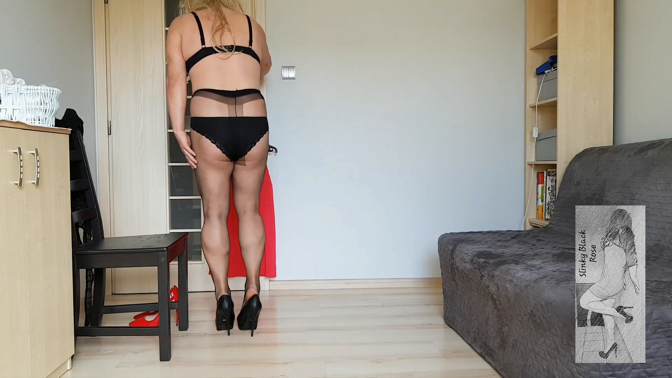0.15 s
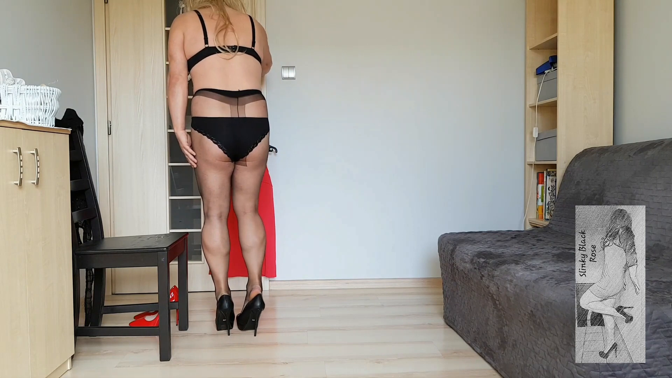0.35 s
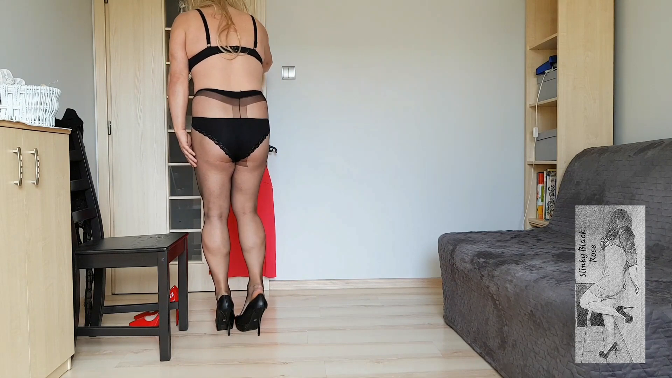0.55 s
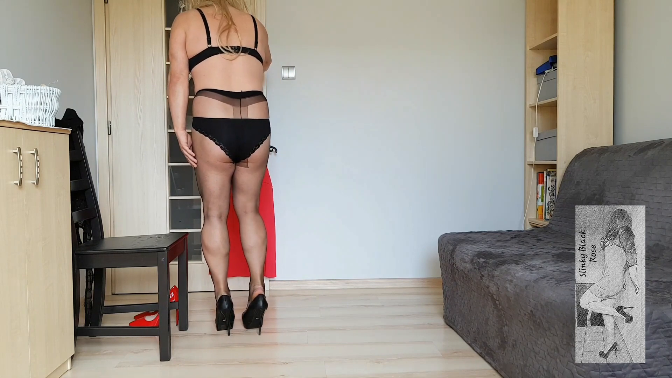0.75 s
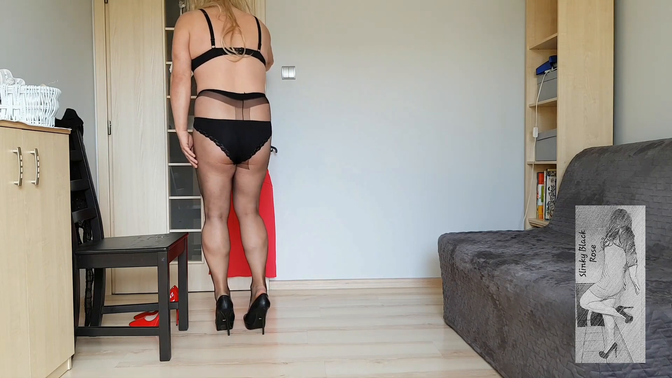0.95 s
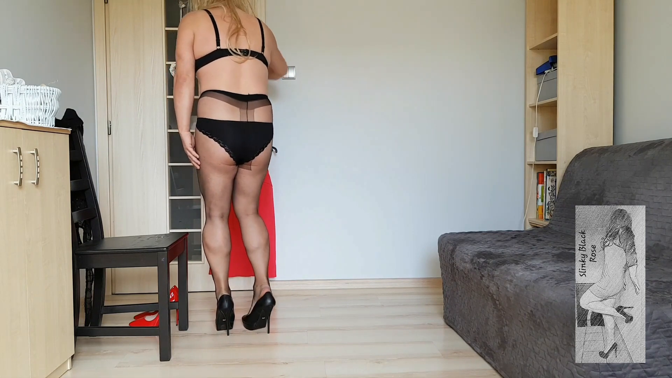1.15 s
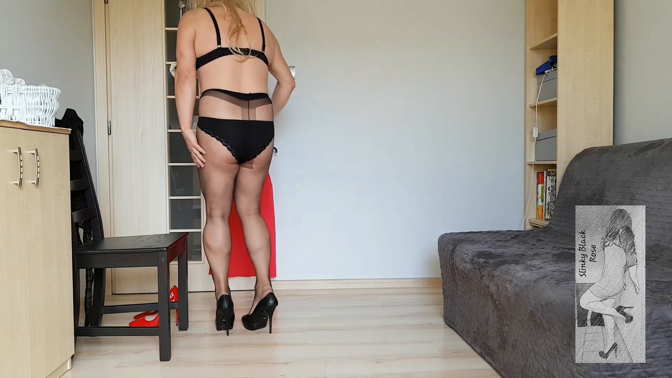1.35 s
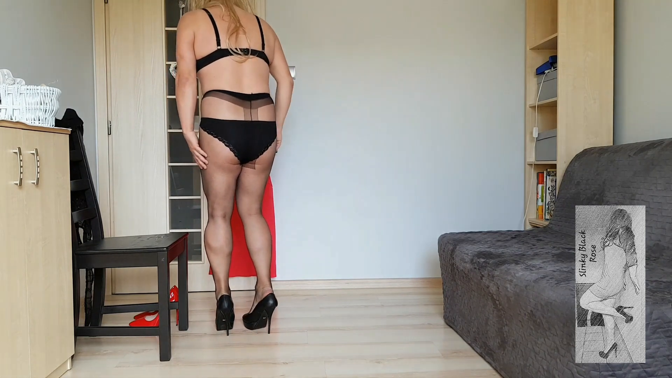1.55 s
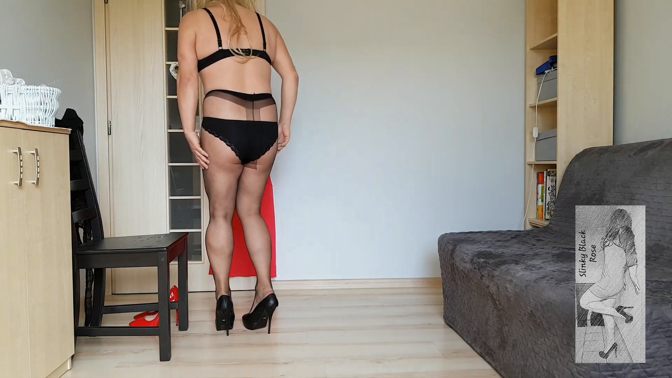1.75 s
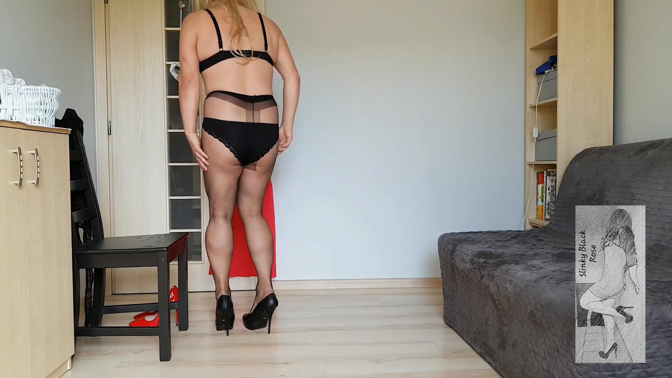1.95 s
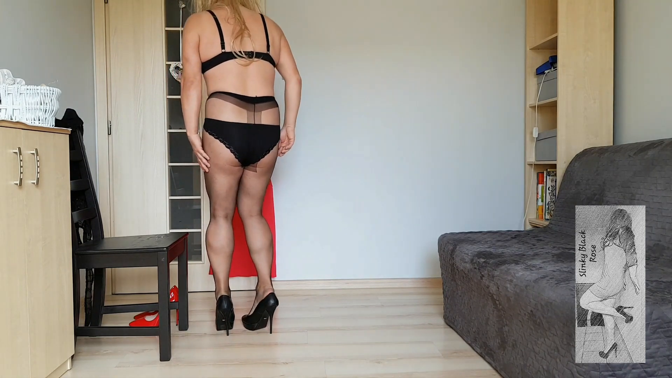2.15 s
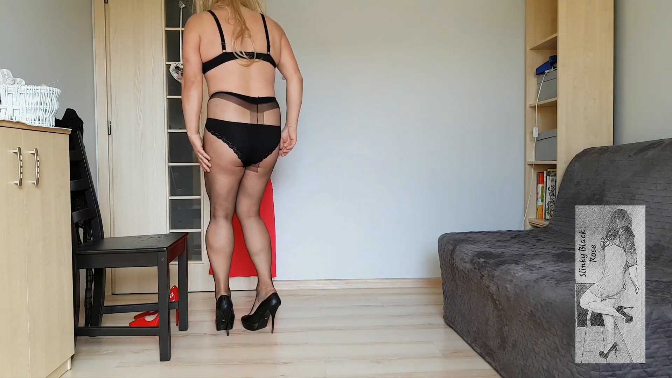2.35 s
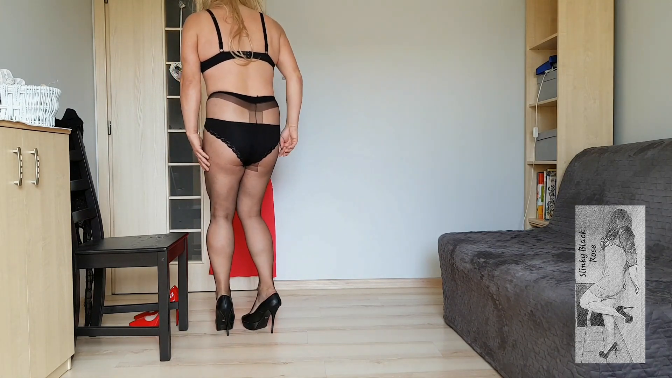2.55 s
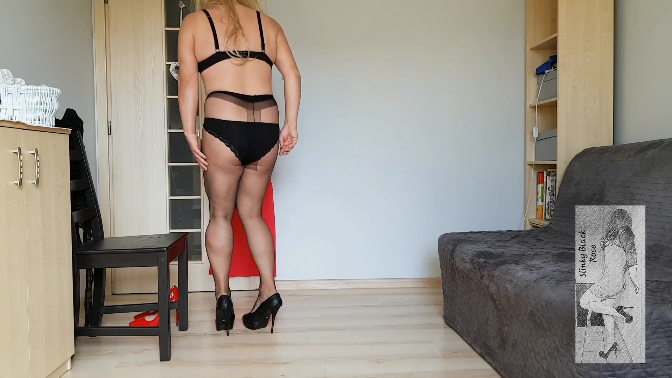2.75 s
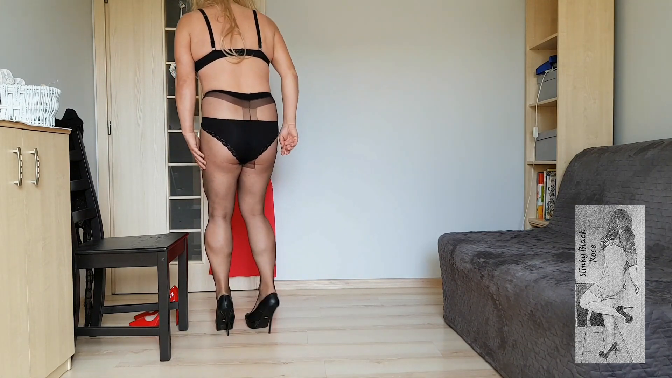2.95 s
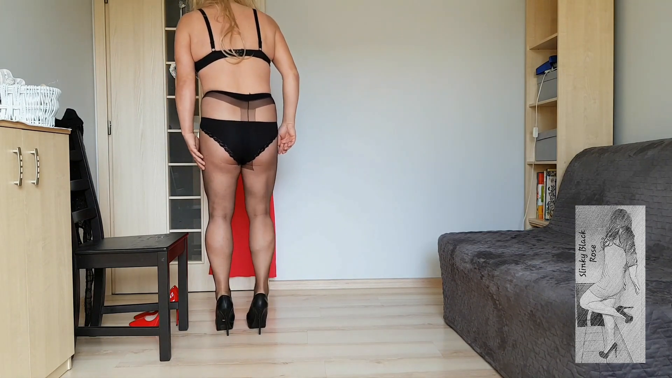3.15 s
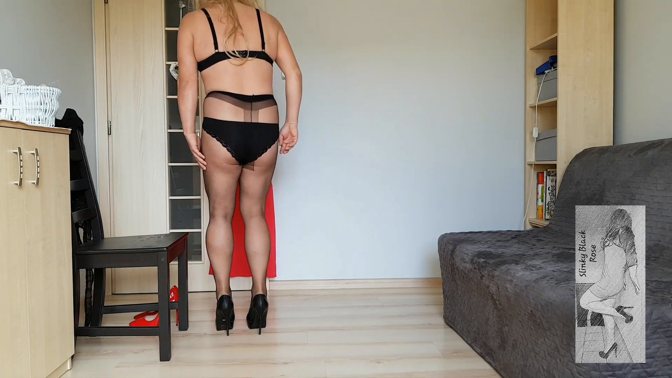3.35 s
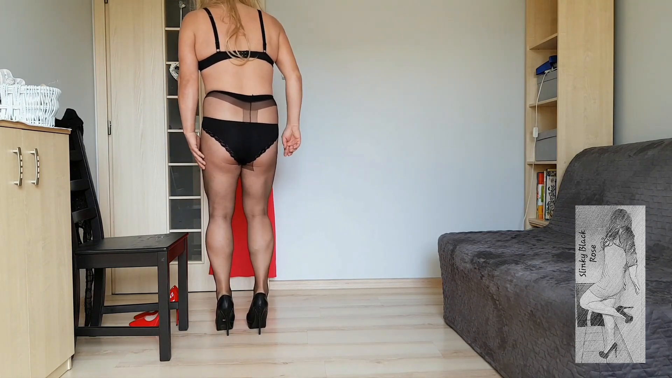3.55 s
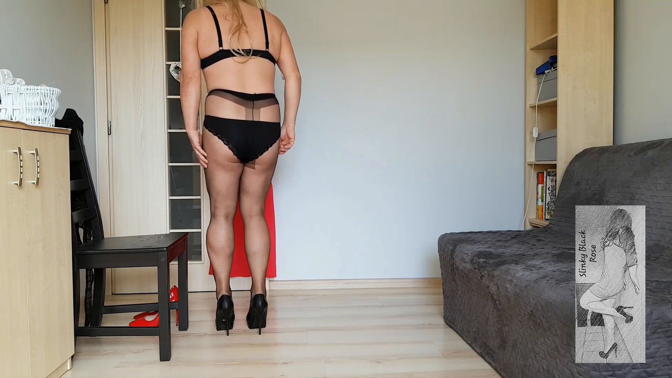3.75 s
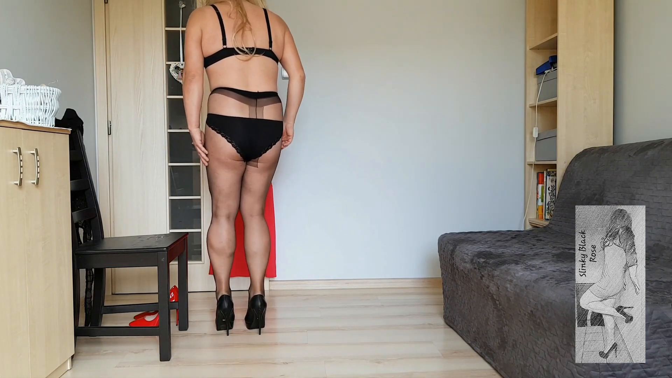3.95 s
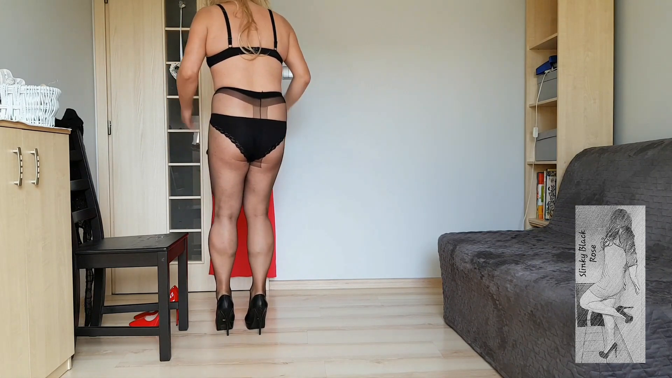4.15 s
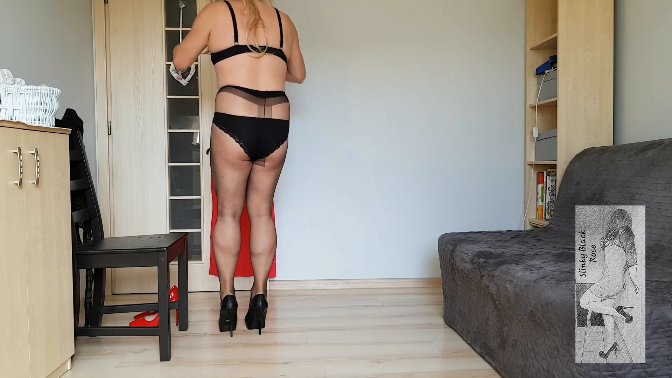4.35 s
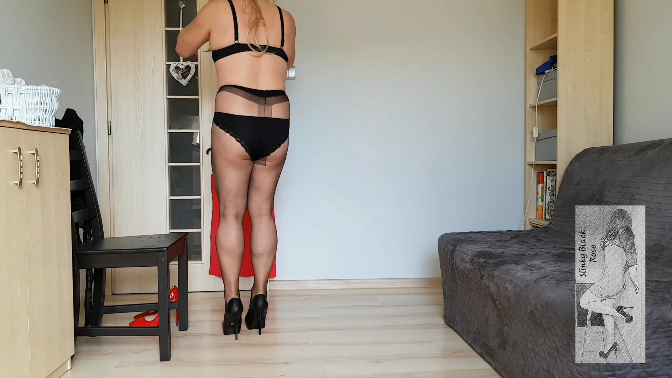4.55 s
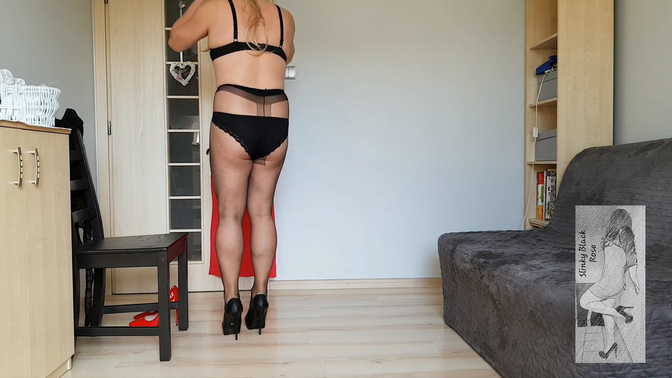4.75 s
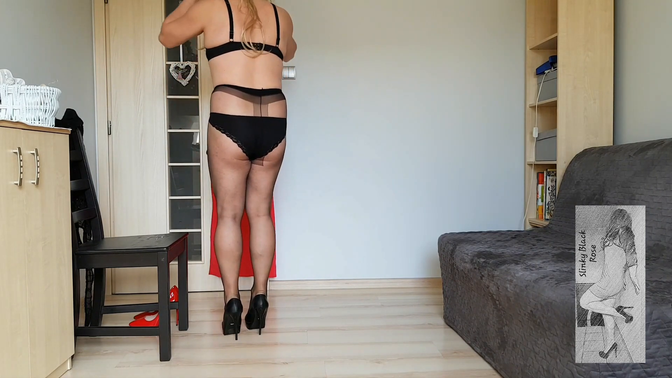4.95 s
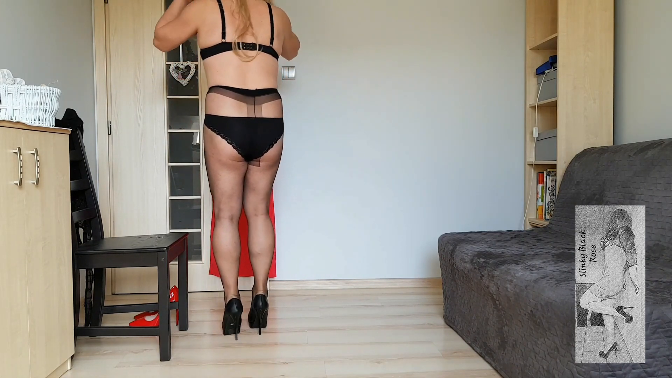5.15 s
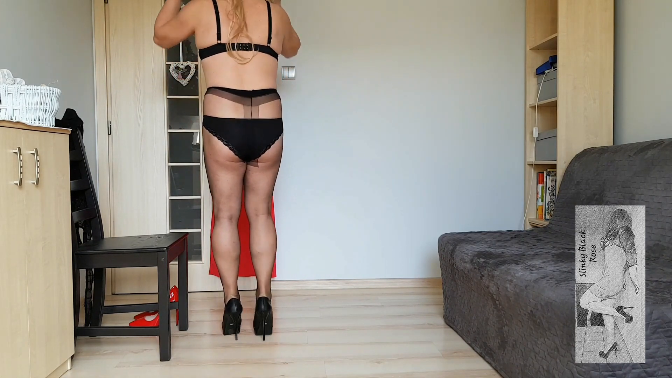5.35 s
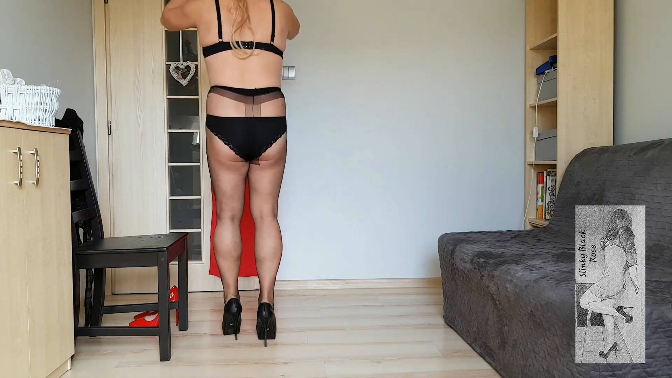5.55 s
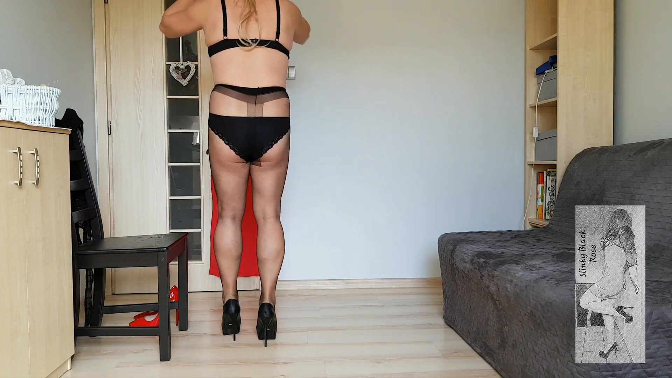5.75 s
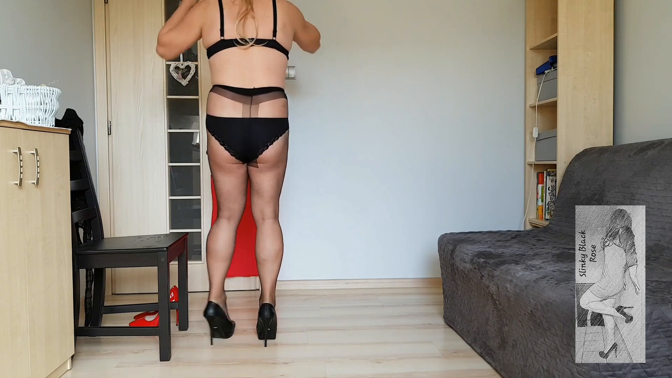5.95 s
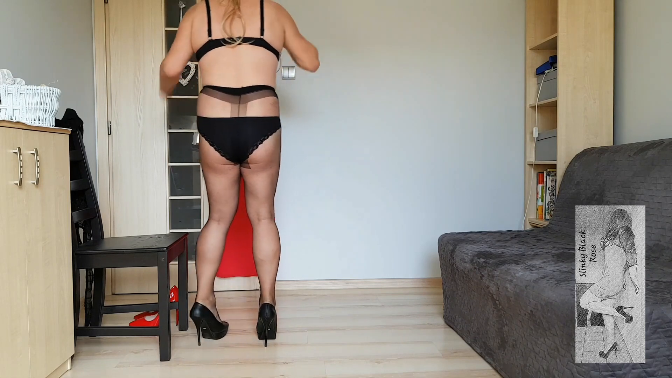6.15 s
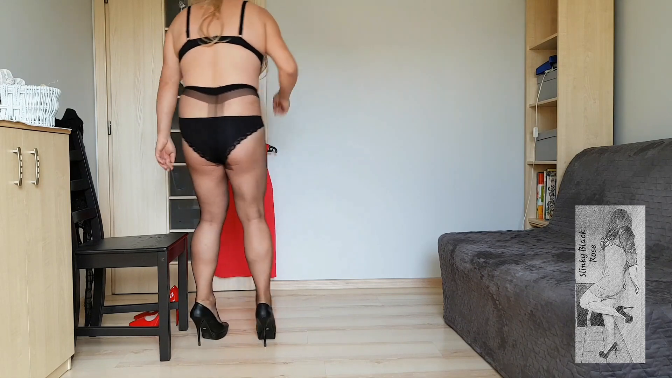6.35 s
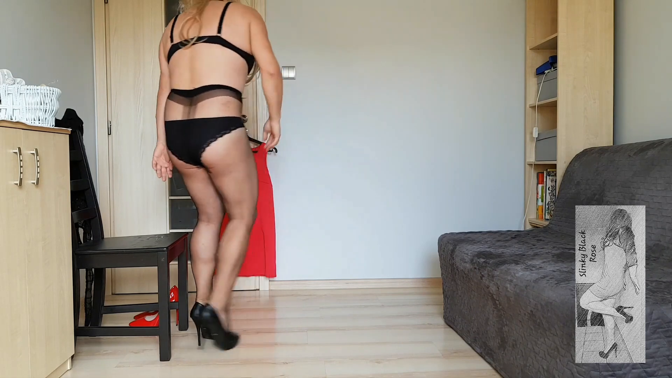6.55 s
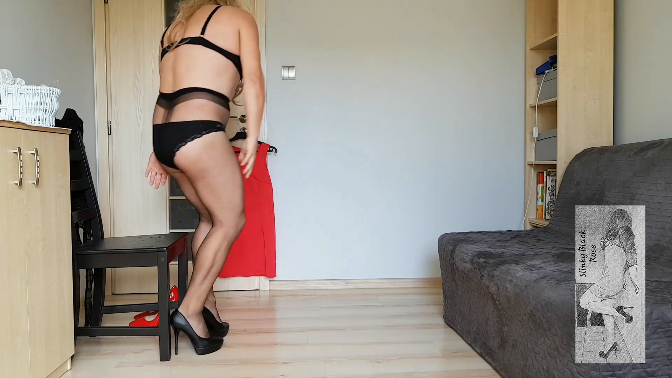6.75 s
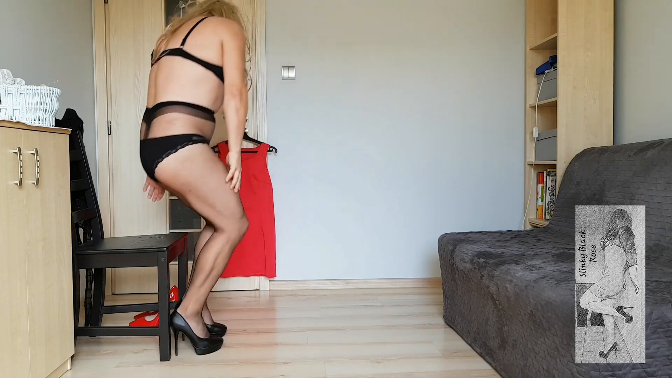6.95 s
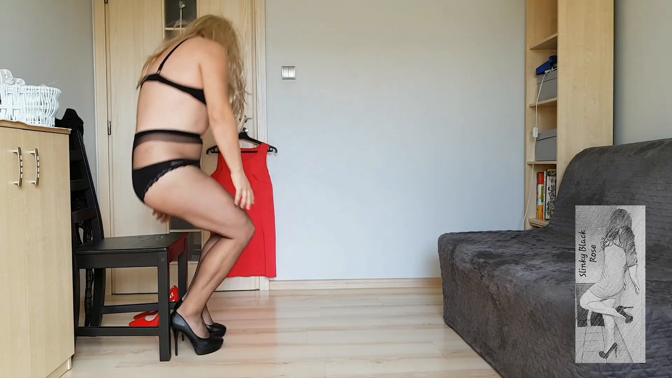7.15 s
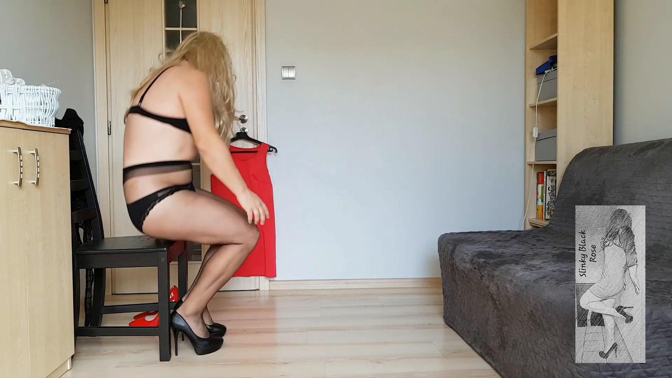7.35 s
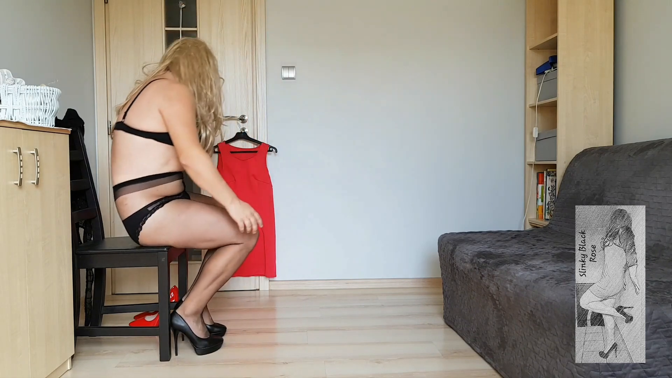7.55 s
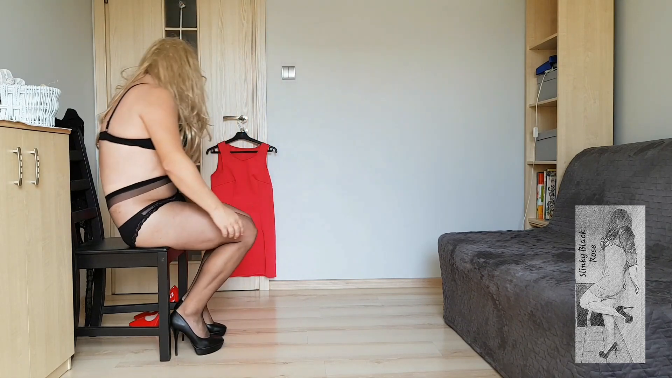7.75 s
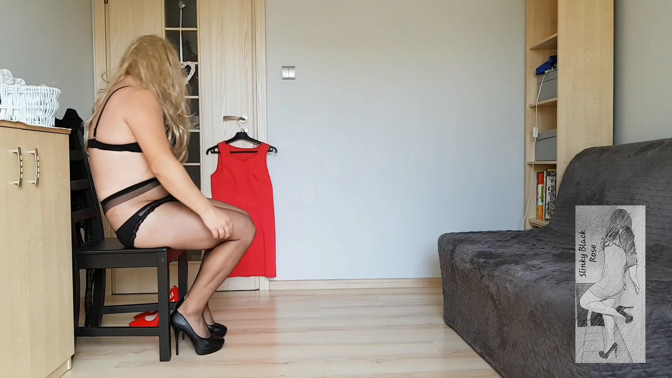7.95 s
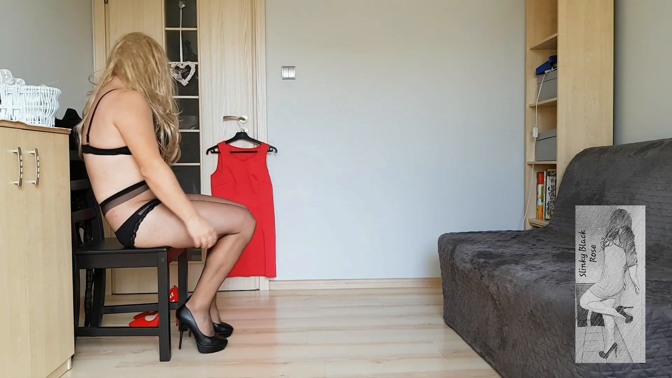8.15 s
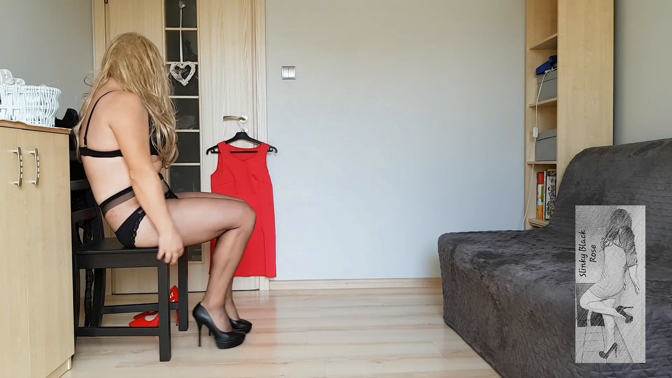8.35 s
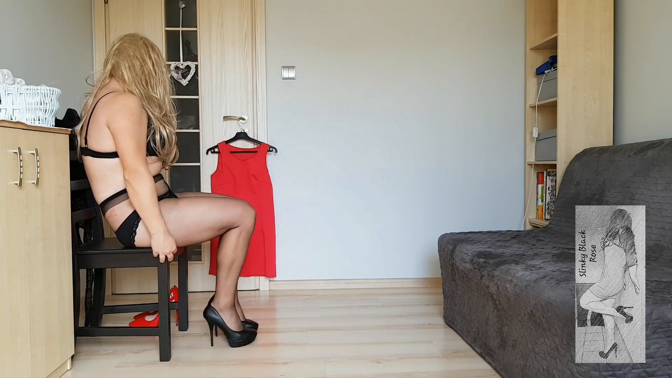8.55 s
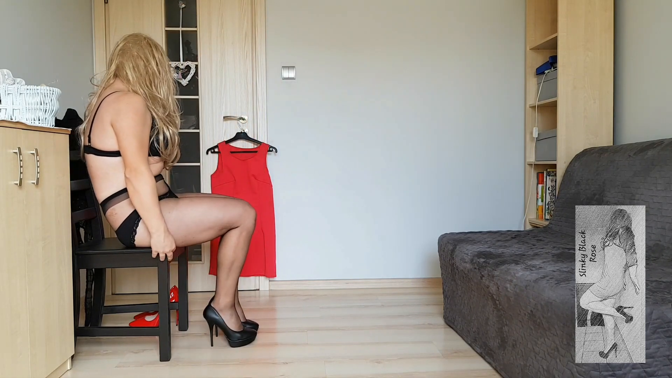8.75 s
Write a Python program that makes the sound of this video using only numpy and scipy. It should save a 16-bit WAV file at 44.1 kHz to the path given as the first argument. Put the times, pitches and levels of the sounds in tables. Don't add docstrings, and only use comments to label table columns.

```python
import sys
import numpy as np
from scipy import signal
from scipy.fft import rfft, irfft, next_fast_len
from scipy.io import wavfile
from scipy.ndimage import uniform_filter1d

SR = 44100
rng = np.random.default_rng(int(sys.argv[2]) if len(sys.argv) > 2 else 0)


def put_to_file(sound):
    columns = np.atleast_2d(sound).T
    safe = np.clip(columns, -1, 1)
    whole_steps = np.round(safe * 32767)
    wavfile.write(sys.argv[1], SR, whole_steps.astype(np.int16))


def amplitude_ratio(level_db):
    exponent = np.asarray(level_db, float) / 20
    return 10 ** exponent


N = 388124

# start_s, peak_db, ring_hz, thud_db (re peak), tick_db (re peak)
HEEL_BLOWS = [(0.139, -52, 815, -15, 1), (1.063, -30.5, 775, -4, -12.5), (1.76, -49.5, 513, -10, -3.5),
              (1.981, -44, 517, 0.5, -19), (2.146, -44.5, 705, -15, -10.5), (2.197, -39, 830, -17, -10),
              (2.484, -49, 574, -17, -19), (3.086, -49.5, 580, 4, -20), (3.268, -47, 608, -3, -7.5),
              (3.311, -13, 720, -12, -23), (3.644, -48, 830, -22, -23), (3.816, -46.5, 820, -16, -24),
              (4.135, -48, 844, -10.5, -11.5), (4.433, -52.5, 790, -13, -15), (4.616, -42.5, 780, -20, -10),
              (4.684, -24, 837, -3, -20.5), (5.697, -38.5, 510, -19, -21.5), (6.281, -23.5, 586, -8.5, -24),
              (6.763, -30, 500, -13, -8), (6.974, -40, 553, 0, -14), (7.106, -38.5, 585, 1.5, -32),
              (7.992, -53.5, 560, -9, -6), (8.706, -22, 540, -9, -25.5)]
# start_s, peak_db, ring_hz, thud_db (re peak), tick_db (re peak)
SOLE_LANDINGS = [(0.014, -52, 905, -5, -30), (0.065, -50.5, 720, -33, -7), (0.906, -47, 760, -7.5, -12),
                 (0.939, -44.5, 855, -11, -10), (1.341, -55.5, 840, -13, -9), (1.497, -52, 810, -21, -11.5),
                 (2.351, -52, 880, -11, -14), (2.697, -48.5, 570, -18, -21), (2.74, -53, 545, -8, -10),
                 (2.877, -52, 533, -8, -7), (3.686, -48, 780, -22, -7.5), (3.863, -47, 495, -16, -5.5),
                 (5.353, -52.5, 860, -11.5, -11), (5.584, -36, 818, -12, -10), (5.604, -40, 620, -24, -13),
                 (5.919, -43, 830, -4.5, -14), (5.944, -46.5, 505, -14, -12.5),
                 (6.309, -35.5, 646, -13.5, -18.5), (6.545, -42, 560, -11, -26),
                 (6.559, -38, 600, -13.5, -15.5), (8.376, -53.5, 547, -8, -32.5),
                 (8.701, -25.5, 535, -2, -22)]
# start_s, peak_db, ring_hz, thud_db (re peak), tick_db (re peak)
SOLE_SKIPS = [
    (0.642, -40, 1060, -38, -22),
    (0.657, -38, 1050, -34, -22),
    (0.677, -38.5, 890, -22, -19),
    (6.945, -44, 959, -26, -12.5),
]
TIP_CHATTER_MS, SOLE_CHATTER_MS, SKIP_CHATTER_MS = 3.5, 16, 28
# mode_hz, width_hz, level_db
BOARD_MODES = [(558, 100, 1.5), (611, 210, 6.5), (670, 160, -2), (785, 110, -6.5), (844, 99, -9.5),
               (1102, 99, -9.5), (1195, 130, -14.5), (1307, 110, -8), (1515, 140, -30.5), (1660, 161, -22)]
# mode_hz, width_hz, level_db
JOIST_MODES = [(110, 25, -16.5), (189, 11, -2.5), (210, 38, -0.5), (257.4, 29, 1.5), (286, 72, 1),
               (325, 17, -4.5)]
# frequency_hz, level_db
TICK_SPECTRUM = [(1000, -6.5), (1700, -2.5), (2500, -2), (4000, -4), (6500, -13), (12000, -91)]
CONTACT_HZ, BOARD_CUT_HZ, SOLE_CUT_HZ = 2350, 470, 920

# start_s, peak_db, pitch_hz,
# width_hz
PLATFORM_TAPS = [(0.066, -46, 735, 90), (0.173, -56, 675, 90), (0.203, -50, 710, 90), (0.468, -55, 557, 80),
                 (0.488, -48, 526, 80), (0.541, -54, 820, 90), (0.660, -38, 914, 120),
                 (0.786, -52, 929, 90), (0.906, -51, 746, 90), (1.982, -52, 900, 250),
                 (2.307, -58, 875, 80), (2.335, -53.5, 840, 80), (2.368, -59, 862, 70),
                 (2.484, -58, 557, 70), (2.565, -55.5, 590, 80), (2.613, -56.5, 662, 80),
                 (2.655, -55, 545, 80), (2.774, -54.5, 560, 80), (2.841, -53, 806, 80),
                 (2.923, -55.5, 477, 80), (3.311, -21, 820, 110), (3.316, -27.5, 490, 60),
                 (3.4, -36.5, 511, 50), (4.136, -59.5, 820, 80), (4.628, -54, 500, 60),
                 (4.652, -55, 664, 90), (4.684, -32.5, 830, 130), (4.688, -30.5, 514, 43),
                 (4.719, -44, 640, 70), (6.312, -39.5, 614, 50), (6.546, -46, 577, 53),
                 (6.564, -39, 505, 56), (6.572, -42, 600, 60), (6.566, -44, 803, 50),
                 (6.975, -49.5, 330, 50), (5.585, -51, 300, 60), (5.697, -43.5, 518, 60),
                 (7.483, -43.5, 354, 20), (7.509, -37, 336, 23), (8.708, -35, 562, 40)]
TAP_RISE_MS = 0.85

# peak_s, rise_s, fall_s, level_db
SOLE_DRAGS = [(0.07, 0.36, 0.92, -57), (0.6, 0.31, 0.078, -55.5), (0.71, .03, 0.054, -54),
              (0.78, 0.059, 0.046, -56.5), (0.84, 0.046, .3, -69), (1.13, 0.037, 0.12, -50.5),
              (1.6, 0.21, 0.12, -60), (2.84, 0.27, .25, -64), (3.28, 0.047, .12, -60),
              (3.38, .05, 0.11, -44), (3.45, 0.18, 0.051, -46), (3.7, .13, .12, -61.5), (3.82, .1, .3, -75),
              (3.94, 0.28, 0.25, -64), (4.63, 0.033, 0.44, -64), (5.37, 0.34, .13, -69.5),
              (5.66, 0.12, .08, -60.5), (5.96, 0.14, 0.096, -57), (6.4, 0.15, 0.11, -65),
              (6.57, 0.059, 0.087, -55.5), (6.79, 0.035, 0.11, -44), (6.98, 0.061, .1, -53),
              (7.12, .3, 0.16, -60.5), (7.52, 0.055, 0.26, -58.5), (7.67, .15, 0.12, -58.5),
              (8.06, 0.16, 0.23, -69), (8.36, 0.27, 0.16, -59.5), (8.693, .004, .03, -49.5),
              (8.8, 0.16, .1, -54)]
# peak_s, rise_s, fall_s, level_db
SOLE_TWISTS = [(0.0, 0.047, 0.13, -54.5), (0.08, .15, .12, -60.5), (0.68, 0.048, .07, -43.5),
               (0.88, .06, .2, -63), (3.32, 0.016, 0.086, -48.5), (6.3, 0.017, 0.086, -59.5),
               (1.99, 0.038, 0.043, -55), (2.94, .25, .3, -70.5), (3.9, 0.085, 0.037, -59.5),
               (4.71, 0.072, 0.11, -57), (5.59, 0.048, .15, -61), (5.96, .1, 0.061, -63),
               (6.57, .045, 0.069, -57.5), (6.79, .035, 0.082, -48), (7.67, 0.094, 0.22, -53.5),
               (8.0, 0.14, 0.37, -67.5), (8.8, 0.43, .1, -63.5)]
# peak_s, rise_s, fall_s, level_db, nylon_swish_db (re level)
GRIT_SCUFFS = [(0.07, .2, 0.12, -71, -8), (0.2, .3, 0.43, -71, -11), (0.661, 0.025, 0.079, -46.5, -7.5),
               (0.79, 0.022, 0.036, -59.5, -1.5), (1.08, 0.072, 0.18, -61.5, -12.5),
               (1.76, .045, 0.17, -65, -19), (2.2, 0.063, 0.12, -68.5, -15), (2.91, .11, 0.055, -68.5, -9),
               (3.06, 0.24, 0.16, -68, -5.5), (3.29, .06, 0.053, -64, -16.5),
               (3.422, 0.0128, 0.092, -54.5, -11.5), (3.46, 0.06, 0.034, -57.5, -13),
               (3.7, .085, 0.061, -61.5, -9.5), (3.9, 0.16, 0.21, -67, -7), (4.19, .1, .12, -77, 8),
               (4.63, 0.035, 0.058, -62, -16), (5.37, 0.26, .2, -73.5, -15),
               (5.59, .03, 0.12, -54.5, -11.5), (5.96, .3, .2, -76.5, -2), (6.3, .055, .15, -73, -19.5),
               (6.788, 0.038, 0.066, -48, -13.5), (7.03, 0.19, 0.1, -63.5, -11),
               (7.52, 0.14, 0.56, -67, -8.5), (7.666, 0.047, 0.057, -43.5, -10.5),
               (8.36, 0.22, 0.096, -64, -12.5), (8.7, .02, 0.085, -53, -32)]
# time_s, level_db
FOOT_FIDGET = [(0, -81), (1.0, -63), (1.3, -78), (1.9, -71), (2.15, -74), (2.4, -70), (3.1, -69.5),
               (4.2, -82.5), (5.2, -80), (6.5, -76.5), (7.4, -93), (8.1, -79), (8.8, -82)]
# mode_hz, width_hz, level_db
SOLE_MODES = [(1120, 630, 11), (1310, 400, 7), (2205, 1200, 9.5)]
# frequency_hz, density_db (per Hz)
GRIT_SPECTRUM = [(880, -42), (1500, -9.5), (1960, -2), (2680, -5), (2940, -4.5), (3300, -5), (3950, -5),
                 (9730, -16), (12000, -32.5), (14500, -51)]
SWISH_HZ, SWELL_DB = 11830, 20
DRAG_SQUEAL_DB, FIDGET_GRIT_DB, FIDGET_SWISH_DB = -14.5, -13, -19

# start_s, peak_db, pitch_hz
STRAP_CLICKS = [
    (0.7945, -39.5, 3950),
    (1.623, -54.5, 2930),
    (6.4938, -51.5, 5100),
    (7.6103, -37.5, 1790),
]

# start_s, peak_db, upper_modes_db (re peak)
JOINT_GIVES = [
    (7.483, -40.5, -19),
    (7.496, -43.5, 2),
    (7.508, -40, -10),
    (7.525, -46, -10),
    (7.542, -51, -14),
    (7.58, -55, -6),
    (7.6, -44.5, -13),
    (7.653, -41, -6),
    (7.7, -51, -6),
]
# mode_hz, width_hz, level_db
FRAME_MODES = [(334, 5.5, -6), (362, 20, -11.5)]
# mode_hz, width_hz, level_db
RUNG_MODES = [(1190, 77, -6), (1194, 50, 3), (1770, 47, -1.5), (2250, 65, -5)]
# time_s, level_db
LEG_SKID = [
    (7.6, -86),
    (7.638, -53.5),
    (7.663, -40),
    (7.679, -58),
    (7.8, -71),
]
# mode_hz, width_hz, level_db
LEG_MODES = [(1030, 110, -5), (1503, 170, -3.5), (1750, 220, -0.5), (2267, 170, -2), (2870, 300, -4),
             (3900, 300, -2), (4805, 250, -8)]
# time_s, level_db
LEG_SING = [
    (7.655, -75),
    (7.668, -43),
    (7.69, -55.5),
    (7.74, -62),
    (7.82, -71),
]
# mode_hz, width_hz, level_db
SING_MODE = [(2940, 60, 0)]

# start_s, level_db, pitch_hz
WEIGHT_THUMPS = [
    (1.982, -52, 91.5),
    (2.009, -39.5, 110),
]

# frequency_hz, t60_s
ROOM_T60 = [(100, 0.25), (300, 0.37), (800, 0.25), (2500, 0.28), (8000, 0.21)]
# frequency_hz, side_minus_mid_db
PORT_SPREAD = [(60, -9), (250, -7.5), (500, -5), (1000, -0.5), (3000, 0)]
# frequency_hz, level_db
DIFFUSE_SHARE = [(150, -2.5), (500, -2.5), (900, -3), (1050, 0), (14000, 0.5)]
# mode_hz, width_hz, level_db
STANDING_WAVES = [(187.2, 14, -4.5), (218.7, 10, -3.5), (256.1, 8.3, 0.5), (284.7, 13.4, 4.5),
                  (325.6, 15, 1), (359.4, 20, -1.5), (453.2, 13, 2), (505.3, 16.5, -4), (534, 18, -2.5),
                  (607.3, 18, 2), (677.6, 16, 0), (729.5, 16, 0), (791.4, 14, -0.5), (876.3, 13, 1)]

# frequency_hz, density_db (per Hz)
HISS_SPECTRUM = [(82, -43), (140, -3.5), (195, 4), (349, 2.5), (440, -2.5), (567, -5.5), (1550, -12),
                 (2340, -13.5), (4980, -21), (7790, -28.5), (9830, -28.5), (13700, -19.5), (14500, -29.5)]
# frequency_hz, density_db (per Hz)
RUMBLE_SPECTRUM = [(25, -16.5), (41, 3.5), (52, -9.5), (78, -0.5), (95, -13), (118, 1), (150, -21.5),
                   (200, -42.5)]
# peak_s, rumble_db
FLOOR_LOADS = [(0.0, -65.5), (1.1, -63.5), (2.02, -63), (2.79, -68), (3.33, -72), (4.6, -73), (5.78, -68.5),
               (6.32, -66), (6.79, -64), (7.01, -61.5), (7.65, -60), (8.73, -59)]
HISS_DB, REST_DB = -66, -71
LOAD_RISE_S, LOAD_FALL_S = 0.069, 0.24

# frequency_hz, left_minus_right_db
PORT_COLOUR = [(60, -0.5), (110, -1), (200, -1), (370, 0), (680, -1.5), (1250, 0.5), (2300, 1.5),
               (4230, 2.5), (7770, -2.5), (14300, 0)]
PORT_LAG_SAMPLES, LOW_CUT_HZ = 1, 158


def read(table, hz):
    f, v = np.transpose(table)
    return np.interp(np.log(np.maximum(hz, 1)), np.log(f), v)


def colour(x, db_of):
    n = next_fast_len(x.shape[-1])
    hz = np.arange(n // 2 + 1) * SR / n
    return irfft(rfft(x, n) * amplitude_ratio(db_of(hz)), n)[..., :x.shape[-1]]


def above(x, hz):
    return signal.sosfilt(signal.butter(3, hz, "high", fs=SR, output="sos"), x)


def unit(x):
    return x / np.sqrt(np.mean(x ** 2))


def ring(modes, gains=0.49, size=4096):
    hz, width, db = np.transpose(modes)[:, :, None]
    t = np.arange(size) / SR
    decay = np.exp(-np.pi * width * t)
    gains = np.reshape(gains, (-1, 1)) * amplitude_ratio(db)
    return np.sum(gains * decay * np.sin(2 * np.pi * hz * t), axis=0)


def place(out, start_s, part, peak_db):
    i = int(start_s * SR)
    out[i:i + len(part)] += amplitude_ratio(peak_db) * part / np.abs(part).max()


def slips(rate, scatter_db):
    moment, sign, size = rng.random((3, N))
    size_db = scatter_db * np.minimum(-np.log(1 - size), 4)
    return (moment < rate / SR) * np.sign(sign - 0.5) * amplitude_ratio(size_db)


def walk(rate):
    k = int(SR / rate)
    held = np.repeat(rng.standard_normal(N // k + 1), k)
    return unit(uniform_filter1d(held, k)[:N])


def played(x, curve):
    time_s, level_db = np.transpose(curve)
    return unit(x) * amplitude_ratio(np.interp(np.arange(N) / SR, time_s, level_db, -120, -120))


def swells(peaks, rises, falls, levels_db):
    t, power = np.arange(0, N + 64, 64) / SR, 0
    for s, rise, fall, db in np.broadcast(peaks, rises, falls, levels_db):
        drop_db = SWELL_DB * np.maximum((s - t) / rise, (t - s) / fall)
        power = power + amplitude_ratio(2 * (db - drop_db))
    return np.interp(np.arange(N) / SR, t, np.sqrt(power))


def spread(mid, side):
    side = colour(side, lambda hz: read(PORT_SPREAD, hz))
    return np.array([mid + side, mid - side])


def heels():
    out, t = np.zeros(N + 16384), np.arange(4096) / SR
    board_hz = np.transpose(BOARD_MODES)[0]
    give = t[:256] ** 2 * np.exp(-2 * np.pi * CONTACT_HZ * t[:256])
    kinds = ((HEEL_BLOWS, TIP_CHATTER_MS), (SOLE_LANDINGS, SOLE_CHATTER_MS), (SOLE_SKIPS, SKIP_CHATTER_MS))
    for blows, chatter_ms in kinds:
        for s, db, hz, thud_db, tick_db in blows:
            chance = rng.standard_normal(8192)
            push = chance[:4096] * np.exp(-t / (chatter_ms / 1000)) * chatter_ms / 45
            push[0] = 1
            near = amplitude_ratio(4.1 * chance[4096:4096 + len(BOARD_MODES)] - 4.9 * np.abs(np.log2(board_hz / hz)))
            board = ring(BOARD_MODES, near) + 6.6 * ring([(hz, 120, 0)])
            board = np.convolve(above(board, max(BOARD_CUT_HZ, hz - 230)), give)[:4096]
            joist_gains = amplitude_ratio(0.62 * chance[4200:4200 + len(JOIST_MODES)])
            thud = np.convolve(ring(JOIST_MODES, joist_gains), give)[:4096]
            burst = chance[4096:] * np.exp(-t / (0.0013 + chatter_ms / 1000))
            tick = colour(burst, lambda f: read(TICK_SPECTRUM, f))
            place(out, s, signal.fftconvolve(push, board), db)
            place(out, s, signal.fftconvolve(push, thud), db + thud_db)
            place(out, s, tick, db + tick_db)
    return out[:N]


def platform():
    out, t = np.zeros(N + 4096), np.arange(4096) / SR
    for s, db, hz, width in PLATFORM_TAPS:
        rise = 1 - np.exp(-t / (TAP_RISE_MS / 1000))
        place(out, s, ring([(hz, width, 0)]) * rise, db)
    return out[:N]


def soles():
    coarse = slips(1100, 2.0)
    floor = above(ring(BOARD_MODES) + 0.59 * ring([(816, 120, 0)]), BOARD_CUT_HZ) + 0.2 * ring(JOIST_MODES)
    chatter = signal.fftconvolve(coarse, floor)[:N]
    squeal = signal.fftconvolve(slips(2500, 0.83), above(ring(SOLE_MODES), SOLE_CUT_HZ))[:N]
    crushed = slips(9000, 0.86) * amplitude_ratio(4.9 * walk(40))
    grit = colour(crushed, lambda hz: read(GRIT_SPECTRUM, hz) - 8 * np.log2(np.maximum(hz / 7000, 1)))
    swish = colour(slips(9000, 1.5), lambda hz: -30 * np.abs(np.log2(np.maximum(hz, 1) / SWISH_HZ)))

    fidget = amplitude_ratio(np.interp(np.arange(N) / SR, *np.transpose(FOOT_FIDGET)))
    drag = np.hypot(swells(*np.transpose(SOLE_DRAGS)), fidget)
    twist = np.hypot(swells(*np.transpose(SOLE_TWISTS)), amplitude_ratio(DRAG_SQUEAL_DB) * drag)
    *when, scuff_db, nylon_db = np.transpose(GRIT_SCUFFS)
    scuff = np.hypot(swells(*when, scuff_db), amplitude_ratio(FIDGET_GRIT_DB) * fidget)
    brush = np.hypot(swells(*when, scuff_db + nylon_db), amplitude_ratio(FIDGET_SWISH_DB) * fidget)
    return unit(chatter) * drag + unit(squeal) * twist + unit(grit) * scuff + unit(swish) * brush


def chair():
    out, t = np.zeros(N), np.arange(2048) / SR
    for s, db, upper_db in JOINT_GIVES:
        push = rng.standard_normal(2048) * np.exp(-t / 0.003)
        place(out, s, signal.fftconvolve(push, ring(FRAME_MODES, size=8192)), db)
        place(out, s, signal.fftconvolve(push, ring(RUNG_MODES, size=8192)), db + upper_db)
    leg = signal.fftconvolve(slips(2070, 1.1), ring(LEG_MODES))[:N]
    sing = signal.fftconvolve(slips(900, 1.5), ring(SING_MODE))[:N]
    return out + amplitude_ratio(2.0) * played(leg, LEG_SKID) + played(sing, LEG_SING)


def straps():
    out, t = np.zeros(N), np.arange(2048) / SR
    for s, db, hz in STRAP_CLICKS:
        rattle = rng.standard_normal(2048) * np.exp(-t / 0.0051)
        place(out, s, signal.fftconvolve(rattle, ring([(hz, hz / 1.8, 0)], size=512)), db)
    return out


def thumps():
    out, t = np.zeros(N), np.arange(8192) / SR
    for s, db, hz in WEIGHT_THUMPS:
        i = int(s * SR)
        out[i:i + len(t)] += amplitude_ratio(db) * ring([(hz, 14, 3)], size=8192) * (1 - np.exp(-t / 0.0049))
    return out


def room(size=32768):
    t = np.arange(size) / SR
    sparse = rng.random((2, size)) < np.clip((t / 0.06) ** 2, 0.004, 1)
    strength = (t > 0.005) / np.sqrt(np.clip((t / 0.057) ** 2, 0.004, 1))
    echoes = rng.standard_normal((2, size)) * sparse * strength

    def octave(f, hz):
        away = np.clip(np.log2(np.maximum(f, 1) / hz), -1, 1)
        return 20 * np.log10(np.cos(np.pi / 2 * away) ** 2 + 1e-9)

    tail = 0
    for hz in 60 * 2. ** np.arange(9):
        band = colour(echoes, lambda f: octave(f, hz))
        tail = tail + band * amplitude_ratio(-60 * t / read(ROOM_T60, hz))
    lumps = uniform_filter1d(np.abs(rfft(tail)) ** 2, size=16, axis=1)
    tail = colour(tail, lambda f: -10 * np.log10(lumps))
    tail = tail * (t > 0.004) * np.clip(5 - t / 0.13, 0, 1)
    tail = colour(tail, lambda f: read(DIFFUSE_SHARE, f)) * (t > 0.004)
    signs = (-1.) ** np.arange(len(STANDING_WAVES))
    waves = ring(STANDING_WAVES, signs, size=size)
    tail[0] += 0.0033 * waves * np.clip(t / 0.015, 0, 1)
    return spread(*tail) / np.sqrt(np.sum(tail[0] ** 2))


def hush():
    hiss = colour(spread(*rng.standard_normal((2, N))), lambda hz: read(HISS_SPECTRUM, hz))
    rumble = colour(spread(*rng.standard_normal((2, N))), lambda hz: read(RUMBLE_SPECTRUM, hz))
    peaks, loads_db = np.transpose(FLOOR_LOADS)
    weight = np.hypot(swells(peaks, LOAD_RISE_S, LOAD_FALL_S, loads_db), amplitude_ratio(REST_DB))
    return unit(hiss) * amplitude_ratio(HISS_DB) + unit(rumble) * weight


def scene():
    knocks = heels() + platform()
    rubs = soles() + chair() + straps()
    direct = amplitude_ratio(-1.0) * knocks + amplitude_ratio(-5.0) * rubs
    into_room = amplitude_ratio(0.96) * knocks + amplitude_ratio(-1.5) * rubs
    wet = signal.fftconvolve(into_room[None], room(), axes=1)[:, :N]
    heard = np.array([direct, np.roll(direct, PORT_LAG_SAMPLES)]) + wet
    return above(heard, LOW_CUT_HZ) + thumps() + hush()


def roll_off(x):
    return signal.sosfilt(signal.butter(12, 14870, fs=SR, output="sos"), x)


def record(dry):
    left = colour(dry[0], lambda hz: read(PORT_COLOUR, hz) / 2)
    right = colour(dry[1], lambda hz: -read(PORT_COLOUR, hz) / 2)
    return roll_off(np.array([left, right]))


dry = scene()
out = record(dry)
put_to_file(out)
```